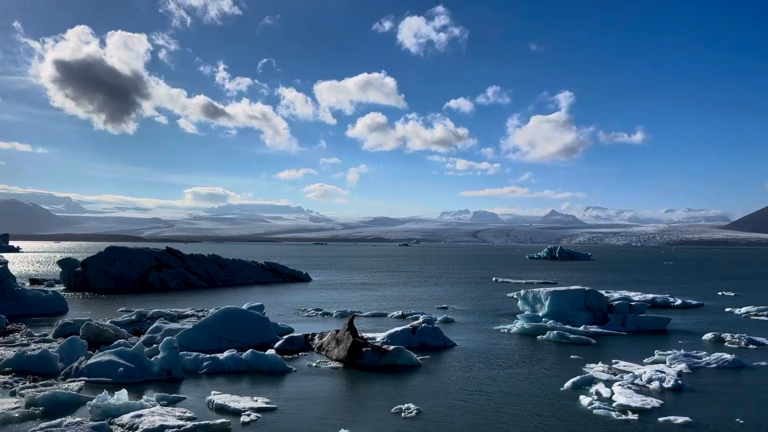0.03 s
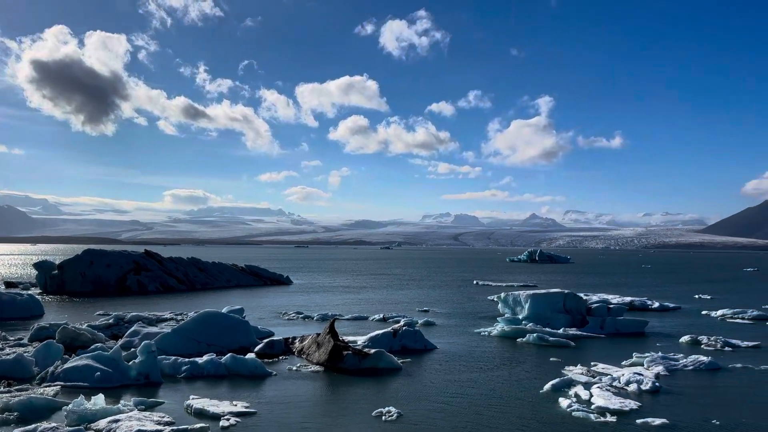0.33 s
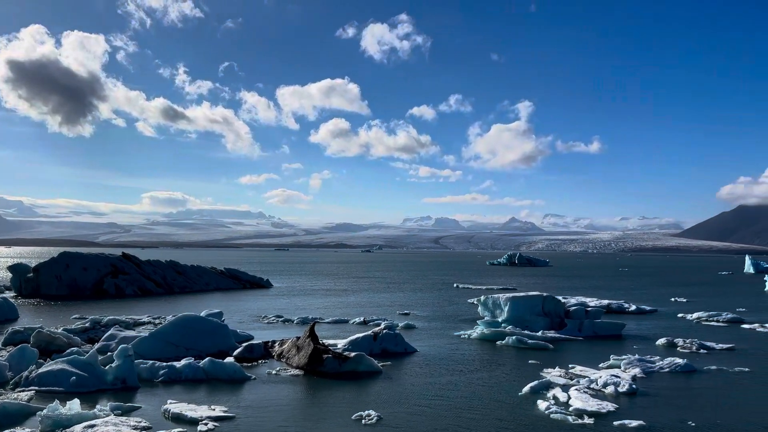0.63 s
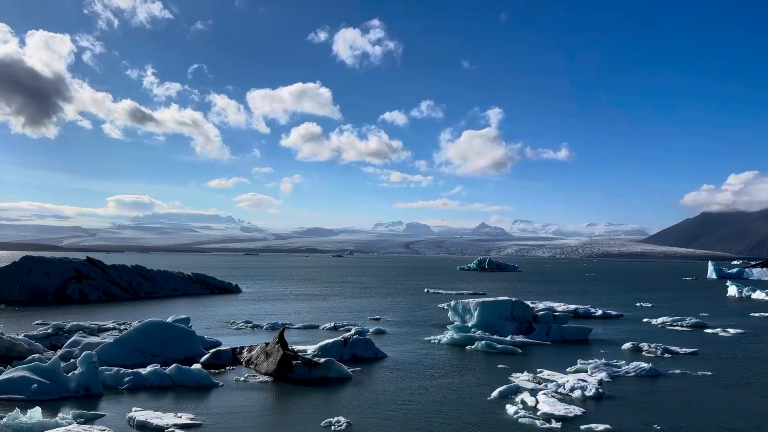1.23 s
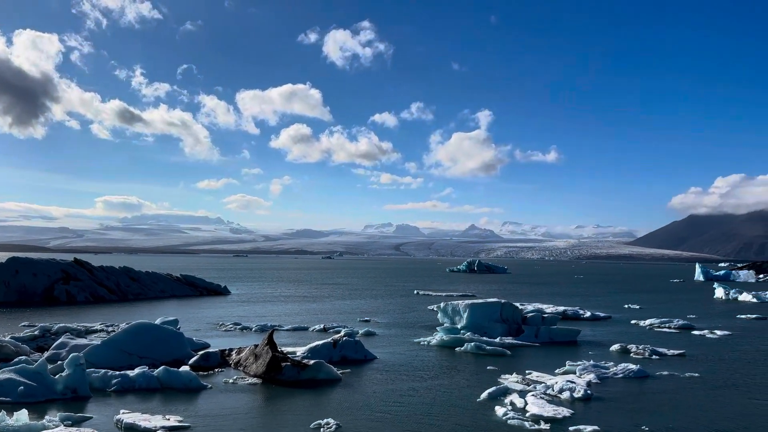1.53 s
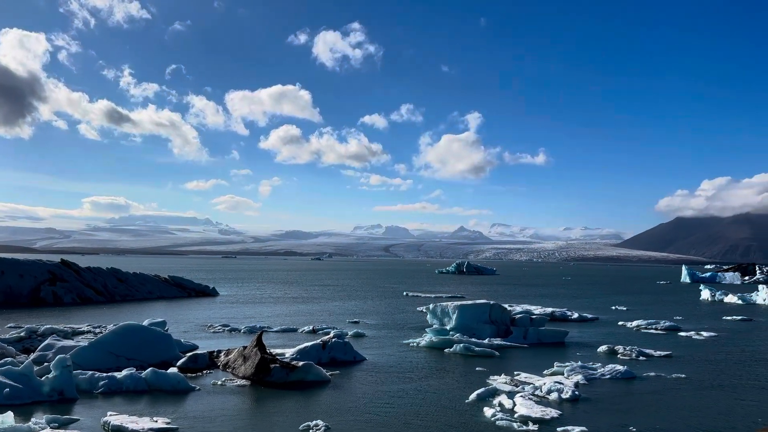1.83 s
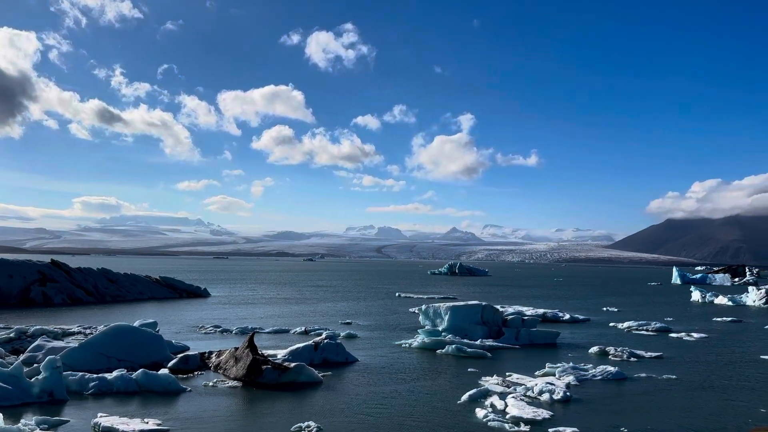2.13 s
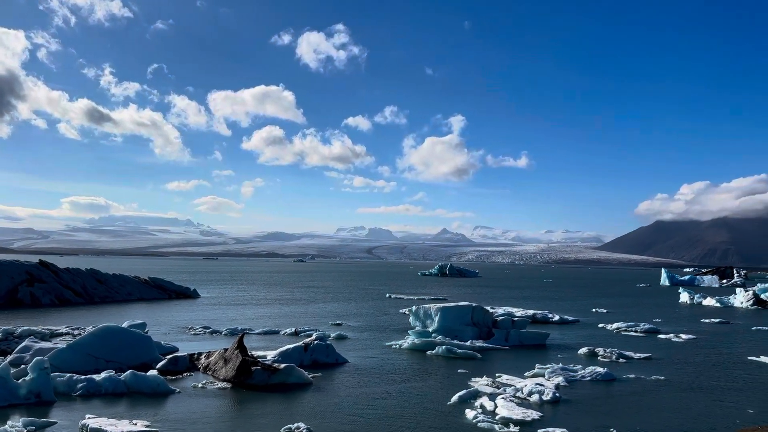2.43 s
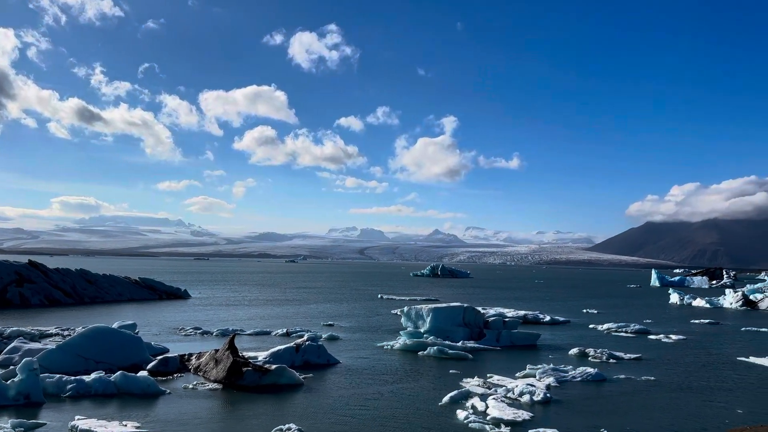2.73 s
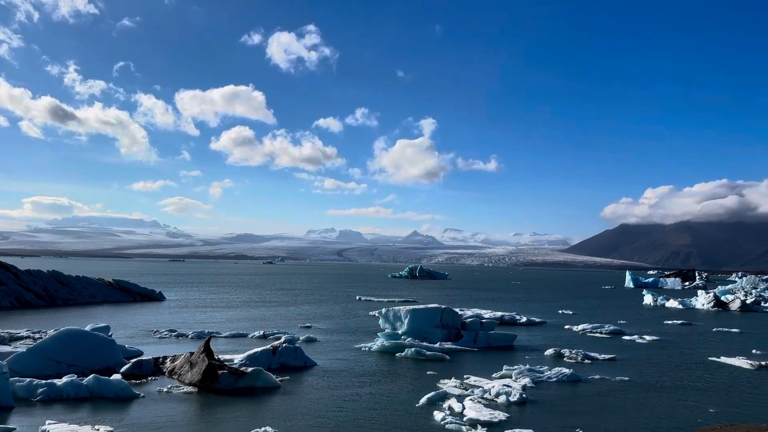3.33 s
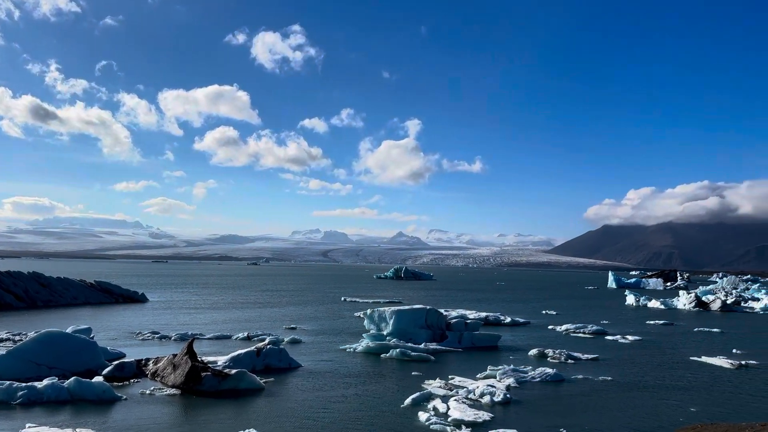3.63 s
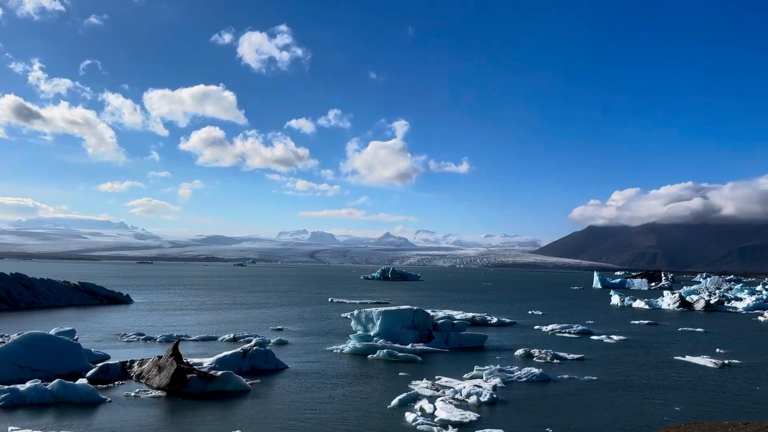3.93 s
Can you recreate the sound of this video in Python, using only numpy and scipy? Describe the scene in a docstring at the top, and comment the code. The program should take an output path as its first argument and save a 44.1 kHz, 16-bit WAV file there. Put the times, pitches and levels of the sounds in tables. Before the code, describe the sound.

Wind buffets the microphone beside an open lagoon, rushing and fluttering unevenly with almost no bass. An early strong gust brings sharp pops on the left, and a later one crackles and hisses, with very faint handling scuffs underneath.

```python
"""At an open lagoon, gusty wind blows on the two microphone openings (ports) of a hand-held camera.
Each gust brings a hollow rush, a fluttering buffet and a hiss. Small whirls of air (eddies)
crack like a rattle on the left port, which faces the wind. There is almost no bass, and the
sound's steep lower edge moves up and down. Behind this are a few hollow bumps of air,
one short, narrow band of wind noise and faint scuffs of the hand."""
import sys
import numpy as np
from scipy import signal
from scipy.fft import rfft, irfft
from scipy.io import wavfile
from scipy.ndimage import uniform_filter1d, minimum_filter1d

SR = 44100
rng = np.random.default_rng(int(sys.argv[2]) if len(sys.argv) > 2 else 0)


def store_pcm(level_fs):
    """Save levels as 16-bit WAV."""
    pcm = np.round(np.clip(level_fs, -1, 1) * 32767).astype(np.int16)
    wavfile.write(sys.argv[1], SR, np.atleast_2d(pcm).T)


N = 176400  # 4 seconds

# How hard the wind blows on the ports: time_s, rush_db, buffet_db, treble_db
GUSTS = [(0.0, -24.5, -34.5, -57), (0.04, -31.5, -37.5, -59.5), (0.14, -21.5, -26, -52),
         (0.17, -27.5, -41.5, -60), (0.3, -29, -32, -57), (0.39, -24.5, -39.5, -59),
         (0.42, -35.5, -90, -55), (0.45, -26, -25, -68), (0.49, -19.5, -46, -54), (0.52, -35.5, -60, -57),
         (0.57, -28, -62, -57), (0.61, -39, -79, -59.5), (0.69, -35, -58, -58.5), (0.73, -20.5, -43.5, -58),
         (0.82, -16.5, -30.5, -61), (0.85, -16.5, -27, -40.5), (0.88, -25.5, -25.5, -57),
         (0.9, -16, -17, -42.5), (0.97, -30.5, -33.5, -51), (1.02, -24, -21, -47), (1.06, -28, -33.5, -58),
         (1.13, -25, -23, -52), (1.3, -25, -31.5, -60.5), (1.44, -33.5, -22, -50), (1.49, -34, -35, -64),
         (1.57, -24, -21.5, -45.5), (1.62, -32, -31.5, -61), (1.64, -29.5, -22, -44),
         (1.7, -25.5, -29.5, -58), (1.76, -30, -37, -61), (1.8, -33, -29, -61), (1.85, -29.5, -43.5, -58.5),
         (1.93, -44.5, -70, -63.5), (1.96, -36, -43.5, -58), (2.02, -27.5, -28.5, -61),
         (2.23, -33, -36, -57.5), (2.26, -43.5, -35.5, -68), (2.31, -25.5, -33.5, -55),
         (2.4, -45, -33, -65), (2.48, -37, -42, -59), (2.51, -32, -30.5, -63), (2.57, -30, -27.5, -44.5),
         (2.65, -48, -25, -35), (2.67, -35, -29, -51.5), (2.73, -34, -27, -43.5), (2.82, -34, -36, -41),
         (2.91, -30.5, -27.5, -47.5), (3.02, -34.5, -30, -46), (3.06, -46, -42.5, -59),
         (3.08, -24, -25, -52), (3.18, -31.5, -31, -51.5), (3.36, -32.5, -39.5, -58),
         (3.44, -43.5, -52, -62), (3.48, -31.5, -38, -58), (3.54, -33, -41, -62), (3.72, -24.5, -27.5, -57),
         (3.78, -26, -25.5, -61.5), (4.0, -30.5, -32.5, -64)]
# The strongest eddies that hit the left port: time_s, level_db, relative_treble_db
BIG_EDDIES = [(0.071, -17.5, -44), (0.14, -13, -34), (0.331, -9.5, -18.5), (0.464, -29, -38),
              (0.499, -19, -39), (0.842, -1, -17), (0.85, -6.5, -24.5), (0.888, -20, -23),
              (0.907, -8.5, -22.5), (0.924, -6, -19), (0.939, -16, -13.5), (0.982, -17, -35.5),
              (1.021, -18, -17.5), (1.026, -2, -23.5), (1.089, -10, -29.5), (1.271, -12.5, -14.5),
              (1.32, -14.5, -30), (1.332, -19.5, -7), (1.347, -16, -36), (1.432, -12, -24),
              (1.454, -19, -4), (1.525, -18.5, -32), (1.576, -16.5, -16.5), (1.599, -12, -31),
              (1.633, -18, -22), (1.668, -11, -17), (1.791, -18.5, -44), (2.176, -26, -15),
              (2.31, -14.5, -23), (2.533, -19, -22), (2.59, -19, -1.5), (2.603, -19, -3.5),
              (2.638, -18.5, -16), (2.647, -20.5, -17), (2.663, -18, -24), (2.706, -20, -17),
              (2.724, -14.5, -33), (2.815, -32.5, 6.5), (2.849, -18.5, -10), (2.932, -31.5, 6.5),
              (2.993, -22.5, -0.5), (3.005, -24.5, 2), (3.033, -23.5, 4.5), (3.074, -20, -16),
              (3.247, -33, -8.5), (3.732, -16, -8.5)]
# Short hollow bumps of air: peak_s, half_length_s, pitch_hz, level_db
AIR_BUMPS = [(0.668, 0.011, 630, -37), (0.877, 0.013, 97.4, -48), (0.89, 0.018, 315, -32),
             (0.926, 0.0045, 600, -20.5), (1.134, 0.017, 720, -30.5), (1.317, 0.0076, 700, -30.5),
             (1.04, 0.0054, 300, -46), (2.642, 0.037, 256, -63.5), (3.375, 0.02, 66, -63),
             (3.783, .03, 172, -69.5), (3.79, 0.039, 80, -71), (3.795, 0.038, 368.3, -43)]
# Faint scuffs, probably the hand on the camera: peak_s, half_length_s, level_db
HAND_SCUFFS = [(0.446, 0.009, -71.5), (0.6, 0.28, -78), (0.699, .006, -64), (3.079, 0.0086, -55)]
# The moving edge below which the wind is cut away: time_s, cutoff_hz
LOWER_EDGE = [(0, 398), (.25, 373), (.7, 360), (.85, 330), (.97, 250), (1.05, 293), (1.15, 432), (1.3, 446),
              (1.36, 486), (1.75, 584), (2.12, 472), (2.24, 550), (2.32, 419), (2.56, 425), (2.8, 645),
              (3.03, 687), (3.12, 588), (4, 511)]
# The tone colour of each part of the wind: frequency_hz, relative_level_db
RUSH_SPECTRUM = [(60, 13.5), (300, -11), (540, 1), (850, 4.5), (1200, -4.5), (2000, -17.5), (16000, -84)]
BUFFET_SPECTRUM = [(60, -31), (720, -24), (900, 2.5), (1130, 3.5), (1500, -2), (2000, -4), (2800, -13.5),
                   (4000, -26), (6000, -38), (9000, -57), (16000, -90)]
HISS_SPECTRUM = [(60, -34), (1500, -7.5), (3000, 8.5), (4700, -0.5), (6000, -1.5), (7300, -3), (8300, -4),
                 (9300, -26), (11500, -50.5), (15000, -30.5)]
POP_SPECTRUM = [(60, -19.5), (680, -19.5), (930, -1.5), (1200, 6), (1900, 0), (2800, -3), (4000, -20),
                (6000, -33.5), (8500, -66.5), (11000, -77.5), (16000, -71.5)]
SNAP_SPECTRUM = [(60, -16), (1000, -5.5), (2800, 15), (4500, 5.5), (6000, -5.5), (8300, -10), (9500, -36),
                 (11000, -62), (16000, -71)]
# How far the left port's wave is ahead of the right one's: frequency_hz, lead_radians
PORT_LEAD = [(60, 5.5), (430, -1.85), (600, -2.5), (800, -3), (1100, -4.5), (1600, -5), (2600, -3.5),
             (7200, -14.5)]

TIME_S = np.arange(N) / SR
FREQUENCY_HZ = np.fft.rfftfreq(N, 1 / SR)


def wind():
    """Rush, buffet and hiss flutter together; small eddies pop and, in hard gusts, snap."""
    gust_s, *levels = np.array(GUSTS, float).T
    rush_db, buffet_db, treble_db = (np.interp(TIME_S, gust_s, level) for level in levels)
    flutter = wander(turns_per_s=420)
    swell = normalise(gain(2.5 * wander(turns_per_s=86)))

    rush = turbulence(RUSH_SPECTRUM, flutter, flutter_db=2.68, ports_db=(0.17, 0.63), likeness=0.84)
    buffet = turbulence(BUFFET_SPECTRUM, flutter, flutter_db=3.5, ports_db=(0, -4.5), likeness=0.3)
    hiss = turbulence(HISS_SPECTRUM, flutter, flutter_db=1.7, ports_db=(-0.98, -2.4), likeness=0)
    # Above this level the hiss grows half as fast, and the snaps take over.
    hiss_limit_db = -56.5
    hiss_db = treble_db - 0.5 * np.maximum(treble_db - hiss_limit_db, 0)
    airflow = (rush * gain(rush_db) + buffet * gain(buffet_db)) * swell + hiss * gain(hiss_db)

    # The snaps die away when the buffet drops below a hard gust.
    hard_gust_db = -26.5
    snap_db = treble_db + 13.5 + np.minimum(buffet_db - hard_gust_db, 0)
    pops = small_eddies(per_s=230, spread_db=5, decay_s=0.00057) * swell * gain(buffet_db)
    snaps = small_eddies(per_s=360, spread_db=7, decay_s=0.00027) * swell * gain(snap_db)
    return airflow + hit_left_port(pops, snaps)


def turbulence(spectrum, flutter, flutter_db, ports_db, likeness):
    """Churning air makes fluttering noise; likeness (0 to 1) is how much the two ports share."""
    left, separate = rng.standard_normal((2, N)) * normalise(gain(flutter_db * flutter))
    right = likeness * at_right_port(left) + np.sqrt(1 - likeness ** 2) * separate
    return colour(np.array([left, right]) * gain(ports_db)[:, None], spectrum)


def small_eddies(per_s, spread_db, decay_s):
    """Tiny whirls of air arrive at random, each a very short burst of noise of its own strength."""
    arrives = rng.random(N) < per_s / SR
    strength = gain(spread_db * np.minimum(rng.standard_normal(N), 2))
    fades = signal.lfilter([1], [1, -np.exp(-1 / (decay_s * SR))], arrives * strength)
    return normalise(rng.standard_normal(N) * fades)


def slaps():
    """Each big eddy slaps the port: one sharp kick inside a few milliseconds of churning air."""
    churn_s, churn_db = 0.0018, -4.5
    pops, snaps = np.zeros(N), np.zeros(N)
    for time_s, level_db, relative_treble_db in BIG_EDDIES:
        fade = np.exp(-np.minimum(abs(TIME_S - time_s) / churn_s, 20))
        churn = rng.standard_normal(N) * fade
        slap = gain(churn_db) * churn / np.linalg.norm(churn)
        slap[int(time_s * SR)] += 1  # the sharp kick
        slap *= np.sqrt(2 * churn_s * SR)
        pops += slap * gain(level_db - 2.5)
        snaps += slap * gain(level_db + relative_treble_db - 0.5)
    return hit_left_port(pops, snaps)


def hit_left_port(pops, snaps, sheltered_db=-19.5):
    """Dull pops and bright snaps are loud on the left port, faint on the sheltered right one."""
    left = colour(pops, POP_SPECTRUM) + colour(snaps, SNAP_SPECTRUM)
    return np.array([left, gain(sheltered_db) * at_right_port(left)])


def at_right_port(left):
    """The same pressure reaches the right port out of step; the gap shrinks as the wind turns."""
    turn_at_s, turn_s, gap_kept = 3.08, 0.054, 0.52
    lead_radians = across_frequencies(PORT_LEAD)
    before = irfft(rfft(left) * np.exp(-1j * lead_radians), N)
    after = irfft(rfft(left) * np.exp(-1j * gap_kept * lead_radians), N)
    turned = 0.5 + 0.5 * np.tanh((TIME_S - turn_at_s) / turn_s)
    return before + turned * (after - before)


def air_bumps():
    """Bumps of air sound as brief, hollow, wavering tones that swell and die, alike on both ports."""
    sound = np.zeros(N)
    waver_hz = 20.1 * wander(turns_per_s=108.6)
    for peak_s, half_length_s, pitch_hz, level_db in AIR_BUMPS:
        phase = 2 * np.pi * np.cumsum(pitch_hz + waver_hz) / SR
        sound += np.sqrt(2) * np.sin(phase) * gain(level_db) * hump(peak_s, half_length_s)
    return sound


def narrow_rush():
    """For a moment a narrow, breathy band of wind noise near 1170 Hz stands out, alike on both ports."""
    swell = hump(peak_s=2.737, half_length_s=0.19)
    return noise_band(centre_hz=1170, half_width_hz=83) * swell * gain(-40)


def hand_scuffs():
    """Light rubbing on the camera body makes a thin fizz on both ports."""
    touch = sum(hump(peak_s, half_s) * gain(level_db) for peak_s, half_s, level_db in HAND_SCUFFS)
    return touch * np.array([noise_band(centre_hz=8900, half_width_hz=1000) for port in range(2)])


def thin_bass(sound, leak_db):
    """Cut away what lies below the moving lower edge; a trace of bass leaks through."""
    steepness = 22.2
    frequency_hz, time_s, slices = signal.stft(sound, SR, nperseg=1024, noverlap=768)
    cutoff_hz = np.interp(time_s, *np.array(LOWER_EDGE).T)
    above_edge = (frequency_hz[:, None] / cutoff_hz) ** steepness
    kept = (above_edge + gain(leak_db)) / (1 + above_edge)
    return signal.istft(slices * kept, SR, nperseg=1024, noverlap=768)[1][:, :N]


def colour(sound, spectrum):
    """Give a sound the tone colour in a table, using a filter with an average power gain of 1."""
    cepstrum = irfft(np.log(gain(across_frequencies(spectrum))), N)
    # Folding this onto its first half makes the filter respond after a kick, never before.
    cepstrum[1:N // 2] *= 2
    cepstrum[N // 2 + 1:] = 0
    response = np.exp(rfft(cepstrum))
    return irfft(rfft(sound) * response / np.sqrt(np.mean(abs(response) ** 2)), N)


def across_frequencies(table):
    """Fill in the values between a table's rows, giving each octave equal room."""
    row_hz, values = np.array(table, float).T
    return np.interp(np.log(FREQUENCY_HZ + 1), np.log(row_hz), values)


def wander(turns_per_s):
    """A smooth random wobble with a typical size of 1."""
    window = int(SR / turns_per_s)
    smoothed = uniform_filter1d(rng.standard_normal(N), window, mode="wrap")
    return normalise(uniform_filter1d(smoothed, window, mode="wrap"))


def noise_band(centre_hz, half_width_hz):
    """Noise close to one pitch, with a typical size of 1."""
    band = np.exp(-((FREQUENCY_HZ - centre_hz) / half_width_hz) ** 2)
    return normalise(irfft(rfft(rng.standard_normal(N)) * band, N))


def hump(peak_s, half_length_s):
    """A bell-shaped rise and fall around one moment."""
    return np.exp(-((TIME_S - peak_s) / half_length_s) ** 2)


def gain(level_db):
    """Turn decibels into a number to multiply by."""
    return 10 ** (np.asarray(level_db) / 20)


def normalise(sound):
    """Scale to a typical size (root mean square) of 1."""
    return sound / np.sqrt(np.mean(sound ** 2) + 1e-20)


def scene():
    """Wind and its slaps with the bass thinned out, plus bumps, a narrow rush and faint scuffs."""
    gusts = thin_bass(wind(), leak_db=-53) + thin_bass(slaps(), leak_db=-28)
    return gusts + air_bumps() + narrow_rush() + hand_scuffs()


def record(dry):
    """A fast limiter turns down the loudest peaks, and the recorder cuts the highest treble."""
    ceiling, top_hz = 0.85, 15800
    safe_volume = np.minimum(ceiling / (abs(dry).max(axis=0) + 1e-9), 1)
    held_volume = minimum_filter1d(safe_volume, size=129)
    smooth_volume = uniform_filter1d(uniform_filter1d(held_volume, size=64), size=64)
    treble_cut = signal.ellip(8, 0.2, 70, top_hz, fs=SR, output="sos")
    return signal.sosfilt(treble_cut, dry * smooth_volume)


dry = scene()
out = record(dry)
store_pcm(out)
```